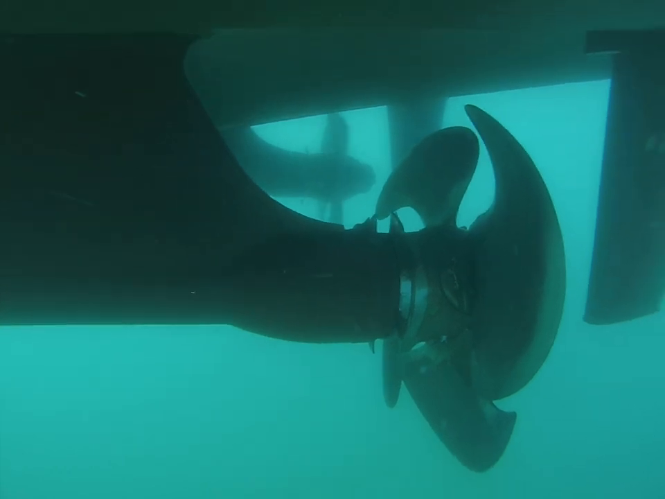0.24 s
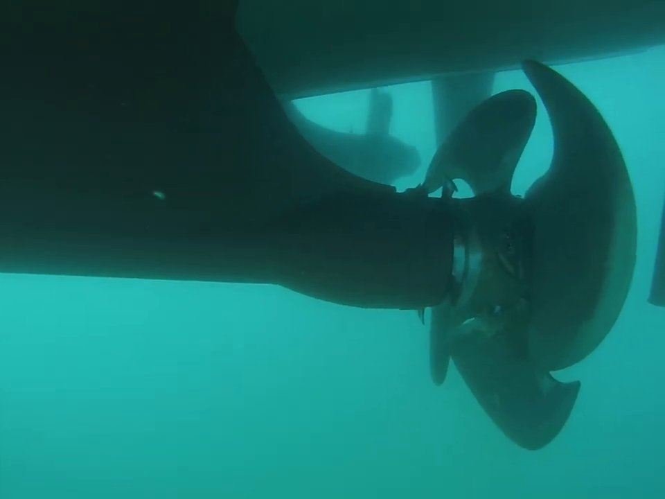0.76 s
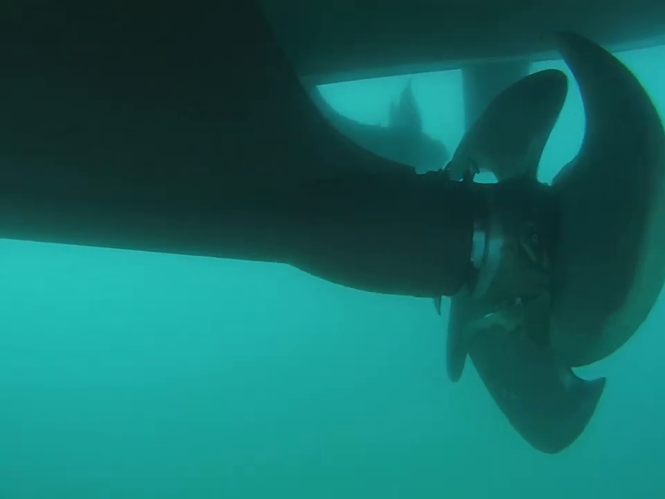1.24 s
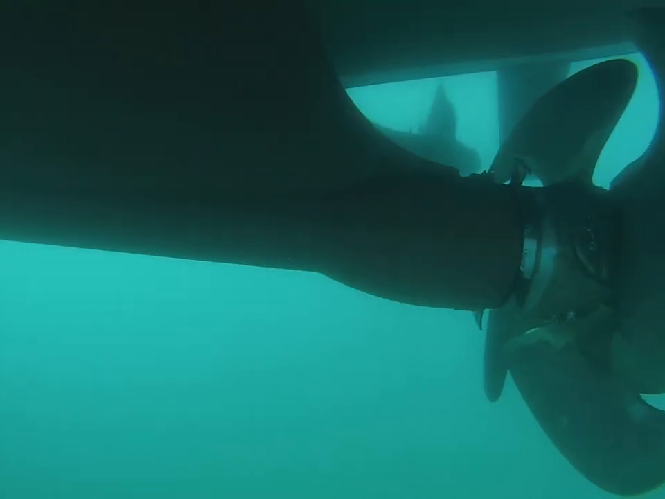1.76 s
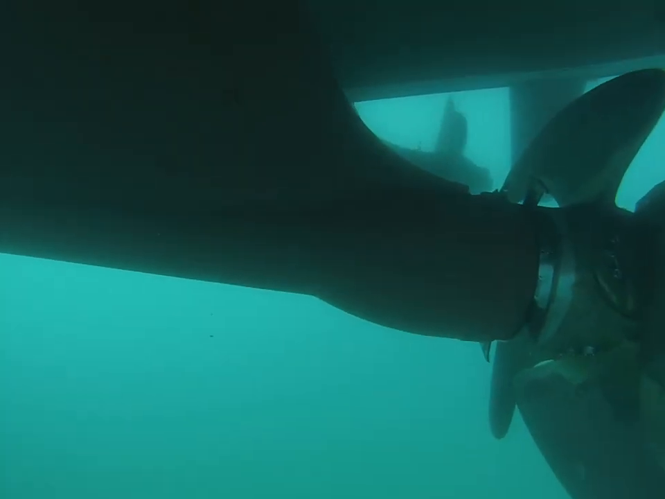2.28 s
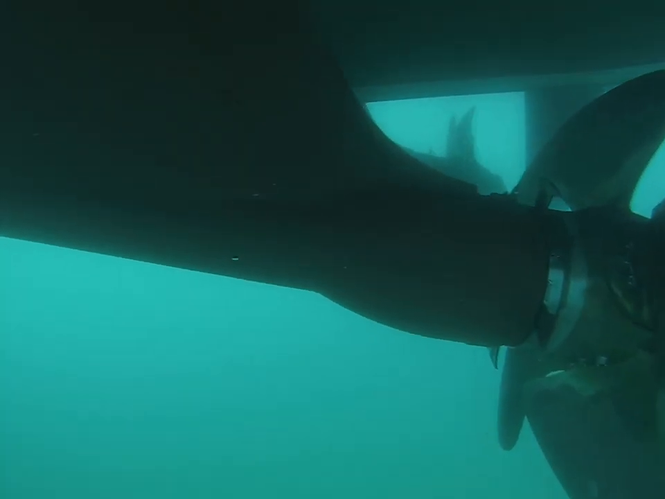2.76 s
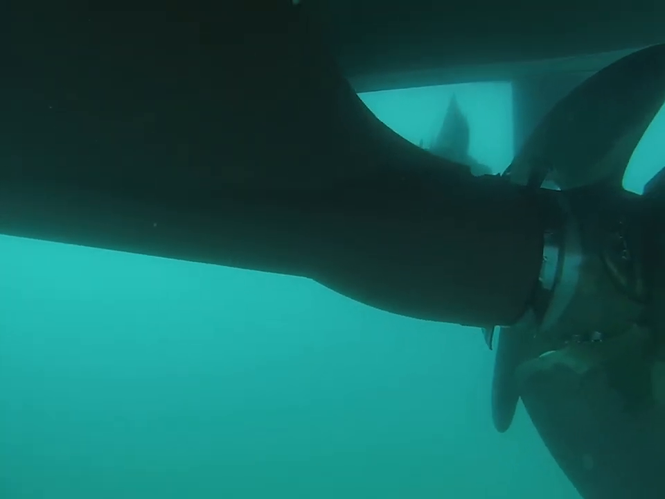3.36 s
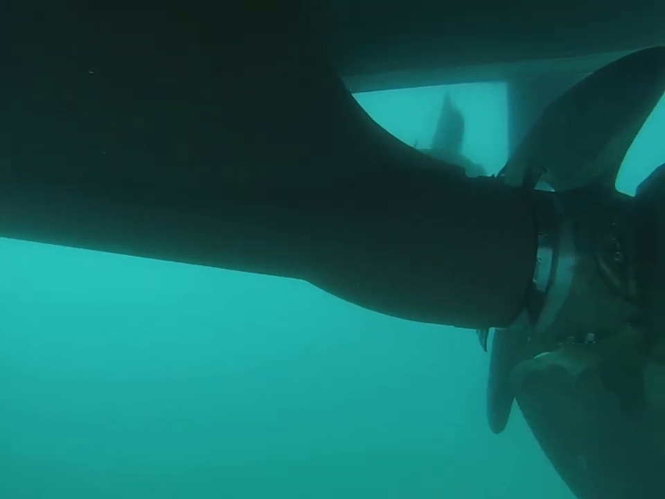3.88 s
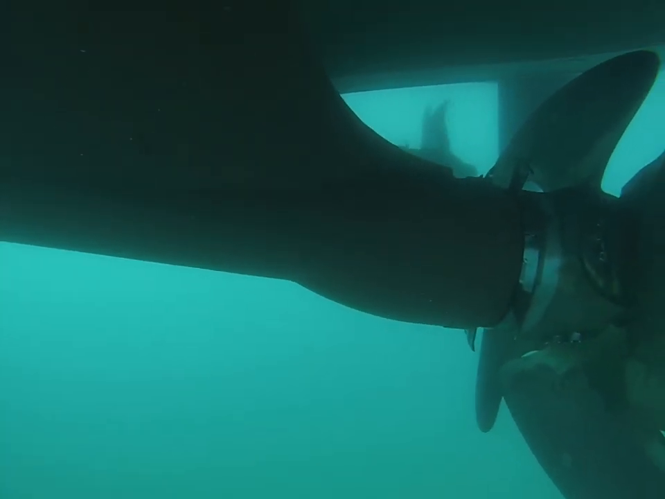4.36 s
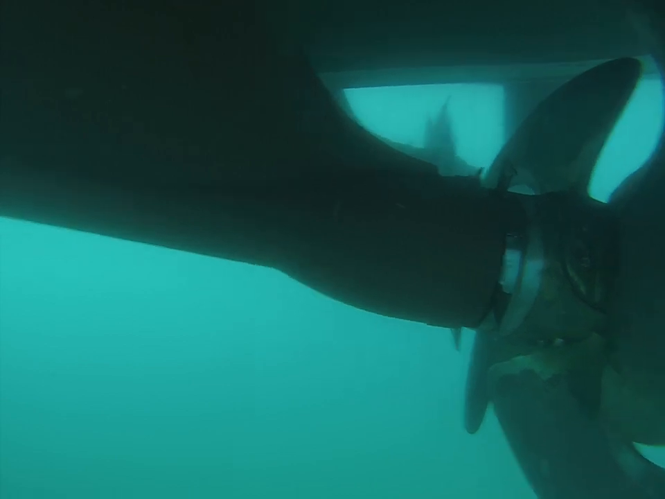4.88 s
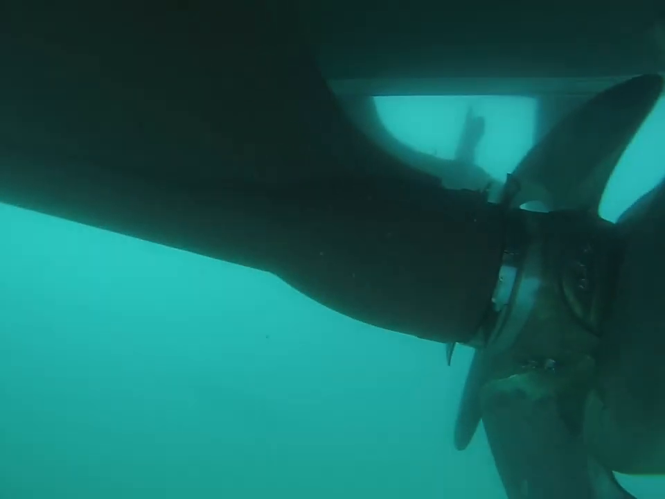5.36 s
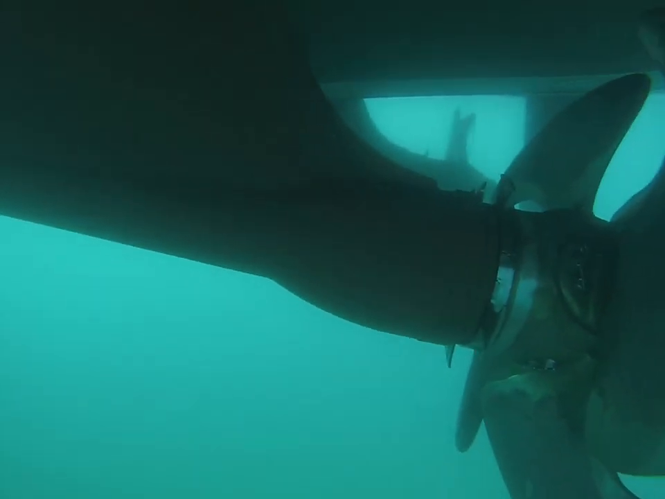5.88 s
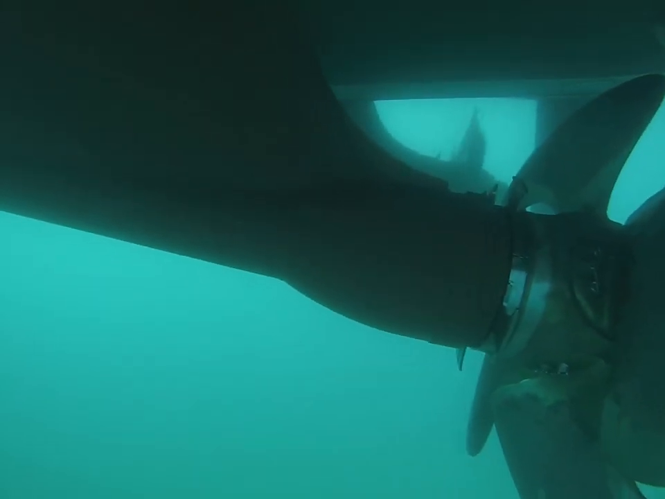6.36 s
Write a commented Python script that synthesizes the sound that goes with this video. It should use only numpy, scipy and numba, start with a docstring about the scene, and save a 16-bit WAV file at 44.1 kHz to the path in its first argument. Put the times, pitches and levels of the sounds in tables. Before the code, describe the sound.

Underwater beneath a boat, an engine makes a loud, steady low hum and rumble, with a soft hiss of water off the propeller. The drive knocks and chatters in a fast, even rhythm, now and then with a louder clack. Two tiny bubbles blip near the start. From about two seconds in, several dull thumps hit the camera housing, the hardest making the drone dip briefly. The microphone is close, enclosed in the housing.

```python
"""Under a boat, beside the propellers

A diver's camera hangs below the hull, its microphone inside the housing, while the machinery runs. Engine hum
and rumble fill the water, with a steady hiss through the housing and two small bubbles close by. Once a turn
the slack in the drive closes with a knock and a chatter, ringing the housing. Bumps on the housing overload the
microphone, and the gain control ducks the drone after them."""
import sys
import numpy as np
from scipy import signal
from scipy.fft import rfft, irfft, next_fast_len
from scipy.io import wavfile
from scipy.ndimage import uniform_filter1d
from numba import njit

SR = 44100
rng = np.random.default_rng(int(sys.argv[2]) if len(sys.argv) > 2 else 0)


def persist_wave(psi):
    """Save psi, clipped to +-1, as 16-bit WAV."""
    counts = np.round(np.clip(psi, -1, 1) * 32767).astype(np.int16)
    wavfile.write(sys.argv[1], SR, np.atleast_2d(counts).T)


N = 292383
T = np.arange(N) / SR
FFT_SIZE = next_fast_len(N + 8192, real=True)
FREQS = np.maximum(np.arange(FFT_SIZE // 2 + 1) * SR / FFT_SIZE, 1)

# rumble of hull and churned water, all around the microphone: (frequency [Hz], level [dB])
RUMBLE_SPECTRUM = [(10, -25), (28, -8.5), (70, -5), (110, -7), (170, -11.5), (260, -5), (350, -12),
                   (500, -15.5), (680, -22.5), (850, -33.5), (1300, -34), (2500, -54.5), (8000, -70)]
# a steady hiss heard through the housing: (time [s], level [dB])
WASH_LEVEL = [(0, -3.5), (.7, -1), (6.63, -.5)]
# the engine's main hum: (time [s], level [dB])
HUM_LEVEL = [(0, -22), (2.9, -30), (3.9, -25.5), (4.4, -28), (5.8, -26), (6.63, -27.5)]
# machinery tones as the camera drifts along the hull: (frequency [Hz], start level [dB], end level [dB])
ENGINE_TONES = [(30.7, -35.5, -44.5), (49.3, -68, -40), (60.8, -39.5, -65), (90.2, -45, -38.5),
                (139.5, -36.5, -36), (180.2, -35, -37), (242, -50, -39.5), (267, -44, -43),
                (281, -27.5, -51), (307, -51, -40), (372, -47.5, -44.5), (553, -55.5, -47.5),
                (1083, -57, -55.5)]
# small bubbles near the microphone: (time [s], pitch [Hz], level [dB])
BUBBLE_RINGS = [(.219, 1510, -23), (0.324, 1220, -25)]
# resonances of the housing around the microphone:
# (frequency [Hz], nominal width [Hz], wash gain [dB], strike gain [dB], chatter gain [dB])
HOUSING_MODES = [(1421, 320, -21.5, -24, -29), (1644, 165, -15.5, -15, -15.5), (2135, 290, -17, -16, -19),
                 (2253, 370, -19, -2.5, -18), (3378, 517, -28.5, -1, -27), (3678, 150, -23.5, 2, -29),
                 (4053, 285, -33, -3, -37.5), (5287, 760, -38.5, -13.5, -40),
                 (6805, 750, -39.5, -14.5, -36.5), (8460, 180, -54, -34, -55), (9480, 540, -49.5, -20, -45),
                 (10505, 1180, -48, -19, -44), (12300, 830, -64, -38, -64)]
# bumps on the housing: (time [s], level [dB], low-pass cutoff [Hz], ring pitch [Hz], relative ring [dB])
HOUSING_BUMPS = [(0.0887, -6.5, 258.5, 606, -33), (0.38, 4.5, 243, 600, -50),
                 (2.2735, 16.5, 1130, 1570, -10), (2.338, -1, 1500, 900, -3),
                 (2.653, 17.5, 660, 1090, -20.5), (3.3976, 18, 600, 780, -15.5),
                 (3.5633, 10, 850, 795, -10), (3.643, -5.5, 586, 810, -29), (4.556, -8.5, 300, 600, -23),
                 (4.682, 2, 344, 600, -50), (4.8333, 3.5, 1410, 1480, -8.5), (4.9787, 6, 910, 1430, -6),
                 (5.2260, 15, 636, 780, -17), (5.3162, 4.5, 497, 820, -17), (5.4233, -1.5, 350, 850, -20)]
# the housing's wobble after a bump: (frequency [Hz], level [dB], t60 [s])
WOBBLE_MODES = [(84, -23.5, 0.15), (141.4, -20, 0.16), (208.7, -5.5, 0.071), (313, -58, 0.059),
                (526, -44, 0.068)]
# rotation of the drive: (time [s], speed [turns/s])
DRIVE_SPEED = [(0, 15.473), (.6, 15.713), (2, 15.678), (3.3, 15.574), (4.8, 15.697), (6.63, 15.64)]
# each turn's knock, duller as the camera drifts aft: (time [s], strike level [dB], chatter level [dB])
KNOCK_LEVELS = [(0, -0.5, 6), (.75, 1.5, 10), (1.9, -1.5, 12), (2.7, -7.5, 11), (4, -5.5, 11.5),
                (5.2, -12, 11), (6.63, -8, 12.5)]
# the drive slams home with a loud clatter: (time [s], level [dB])
SLAMS = [(0.2921, 18.5), (.548, 14), (0.7376, 17), (0.8034, 17.5), (1.446, 23.5), (1.95, 21), (2.975, 27),
         (3.232, 24.5), (4.002, 23), (4.258, 23.5), (4.3862, 20.5), (5.7898, 25.5), (6.2956, 22.5)]
# turns on which the slack hardly closes: (time [s])
SLIP_TIMES = [.228, .611, 2.908, 4.19]


def undb(db):
    """Decibels to gain."""
    return 10 ** (np.asarray(db) / 20)


def curve(table, column=1):
    """One column of a table, joined by straight lines in time."""
    rows = np.array(table)
    return np.interp(T, rows[:, 0], rows[:, column])


def noise():
    """White noise of unit strength."""
    return rng.standard_normal(N)


def wander(rate_hz):
    """A smooth random drift of unit spread."""
    hold = int(SR / rate_hz)
    steps = np.repeat(rng.standard_normal(N // hold + 1), hold)
    smooth = uniform_filter1d(uniform_filter1d(steps, hold), hold)[:N]
    return smooth / smooth.std()


def decay(kicks, seconds):
    """Each kick dies away with the given time constant."""
    return signal.lfilter([1], [1, -np.exp(-1 / (seconds * SR))], kicks)


def ring(t, hz, t60):
    """One damped resonance."""
    return np.sin(2 * np.pi * hz * t) * np.exp(-np.log(1000) * t / t60)


def add(out, at_s, sound):
    """Mixes a short sound in at the given time."""
    start = int(at_s * SR)
    out[start:start + len(sound)] += sound[:N - start]


def colour(x, gain):
    """Causal filter with the given gain at each frequency: it rings after a hit, never before."""
    cepstrum = irfft(np.log(gain + 1e-7), FFT_SIZE)
    cepstrum[1:FFT_SIZE // 2] *= 2
    cepstrum[FFT_SIZE // 2 + 1:] = 0
    return irfft(rfft(x, FFT_SIZE) * np.exp(rfft(cepstrum)), FFT_SIZE)[:N]


def housing(x, column, skirt):
    """Sound reaches the microphone through the ringing housing; skirt sets how deep the valleys lie."""
    power = 0
    for mode in HOUSING_MODES:
        hz, width_hz = mode[:2]
        detuning = hz / width_hz * (FREQS / hz - hz / FREQS)
        power += undb(mode[column]) ** 2 / (1 + detuning ** 2) ** skirt
    return colour(x, np.sqrt(power))


def tone(hz, db, waver_db, drift_rad):
    """A machinery tone that wavers in level and phase."""
    phase = 2 * np.pi * (hz * T + rng.random()) + drift_rad * wander(3.14)
    return np.sqrt(2) * undb(db + waver_db * wander(6)) * np.sin(phase)


def rumble(flutter_db=2):
    """Hull and churned water surround the microphone with restless low noise."""
    hz, db = np.transpose(RUMBLE_SPECTRUM)
    spectrum = undb(np.interp(np.log(FREQS), np.log(hz), db))
    return colour(noise() * undb(flutter_db * wander(90)), spectrum)


def housing_hiss():
    """A steady hiss reaches the microphone through the ringing housing."""
    return housing(noise() * undb(curve(WASH_LEVEL) + wander(70)), column=2, skirt=2.07)


def engine(hum_hz=75.55, whine_hz=719, whine_db=-48, nearest_s=3.9, half_pass_s=1.1):
    """Hum and weaker tones carry through the water; a gear whine swells as the camera drifts past."""
    hum = tone(hum_hz, curve(HUM_LEVEL), waver_db=1, drift_rad=0.055)
    relative_distance = np.hypot(1, (T - nearest_s) / half_pass_s)
    whine = tone(whine_hz, whine_db, waver_db=4.5, drift_rad=1) / relative_distance
    tones = sum(tone(hz, np.linspace(start_db, end_db, N), waver_db=1, drift_rad=0.053)
                for hz, start_db, end_db in ENGINE_TONES)
    return hum + whine + tones


def bubbles(t60=0.052, rise=0.97):
    """Close to the microphone, each bubble rings briefly and rises in pitch."""
    out, t = np.zeros(N), T[:SR // 10]
    for at_s, hz, db in BUBBLE_RINGS:
        add(out, at_s, undb(db) * ring(t, hz * (1 + rise * t), t60))
    return out


def bumps(flex_hz=145, flick_s=0.0006, flick_cycles=1.172, swell_s=0.0021, ring_t60=0.027):
    """The housing flexes right at the microphone: a flick slowing to a swing, a wobble, a hollow ring."""
    out, t = np.zeros(N), T[:SR // 4]
    cycles = flex_hz * t + flick_cycles * (1 - np.exp(-t / flick_s))
    swell = t / swell_s
    flex = np.sin(2 * np.pi * cycles) * swell * np.exp(1 - swell)
    wobble = sum(undb(db) * ring(t, hz, t60) for hz, db, t60 in WOBBLE_MODES)
    for at_s, db, cutoff_hz, ring_hz, ring_db in HOUSING_BUMPS:
        thud = signal.lfilter(*signal.butter(2, cutoff_hz, fs=SR), flex + wobble)
        hollow = undb(ring_db) * ring(t, ring_hz, ring_t60)
        add(out, at_s, undb(db) * (thud + hollow))
    return out


def drive(start_turn=0.468, strike_s=0.0017, chatter_s=0.004, clatter_s=0.0026,
          impact_db=11, slam_db=10, slip_db=-29, rattle_db=2.5, tick_db=-18, ticks_per_s=8):
    """Close by, the slack in the drive closes once a turn with a strike, then the parts chatter."""
    speed = curve(DRIVE_SPEED)
    turns = start_turn + np.cumsum(speed) / SR
    turn = turns.astype(int)
    since_strike_s = (turns - turn) / speed
    strike_scatter, length_scatter, chatter_scatter = rng.standard_normal((turn[-1] + 1, 3))[turn].T
    slipped = np.isin(turn, np.round(np.interp(SLIP_TIMES, T, turns)))
    strike_gain = undb(curve(KNOCK_LEVELS, column=1) + slip_db * slipped + 2 * strike_scatter)
    chatter_gain = undb(curve(KNOCK_LEVELS, column=2) + slip_db * slipped + 1.5 * chatter_scatter)
    kicks = np.diff(turn, prepend=0) * strike_gain
    # the chatter swells as the parts rebound, and lasts a little longer on some turns
    swell = since_strike_s / (chatter_s * np.exp(0.31 * length_scatter))
    rebounds = chatter_gain * swell * np.exp(1 - swell)
    # now and then the parts slam home; stray ticks fall in between
    slams = np.zeros(N)
    for at_s, db in SLAMS:
        slams[int(at_s * SR)] = undb(db)
    ticks = (rng.random(N) < ticks_per_s / SR) * undb(tick_db + 1.7 * noise())
    # each blow is one clean impact followed by a brief scrape
    strike = undb(impact_db) * kicks + noise() * decay(kicks + ticks, strike_s)
    scrape = noise() * np.hypot(rebounds * undb(rattle_db * wander(700)), decay(slams, clatter_s))
    chatter = undb(slam_db) * slams + scrape
    return housing(strike, column=3, skirt=2.1) + housing(chatter, column=4, skirt=2.05)


def scene():
    """One microphone under the hull: machinery through the water, bumps through the housing."""
    return (engine() + rumble() + drive() + housing_hiss() + bumps() + bubbles())[None]


@njit
def follow_level(rectified, attack, slew, release, rest):
    """The camera's level detector: rises fast at a limited rate, falls slowly, never below rest."""
    out, level = np.empty(len(rectified)), rest
    for i, sample in enumerate(rectified):
        if sample > level:
            level += min((sample - level) * attack, level * slew)
        else:
            level = max(level - level * release, rest)
        out[i] = level
    return out


def record(dry, threshold_db=-19.5, attack_s=0.005, release_s=0.11, duck_db_per_s=3600, ceiling=0.42):
    """The camera's gain ducks on overloads and creeps back; what slips past clips; the top rolls off."""
    threshold = float(undb(threshold_db))
    slew = float(undb(duck_db_per_s / SR)) - 1
    level = follow_level(np.abs(dry[0]), 1 / (attack_s * SR), slew, 1 / (release_s * SR), threshold)
    ducked = dry * threshold / level
    clipped = ducked / (1 + (ducked / ceiling) ** 8) ** (1 / 8)
    treble_rolloff = signal.butter(4, 13000, fs=SR, output="sos")
    steep_cut = signal.ellip(8, 0.2, 70, 15000, fs=SR, output="sos")
    return signal.sosfilt(steep_cut, signal.sosfilt(treble_rolloff, clipped))


dry = scene()
out = record(dry)
persist_wave(out)
```